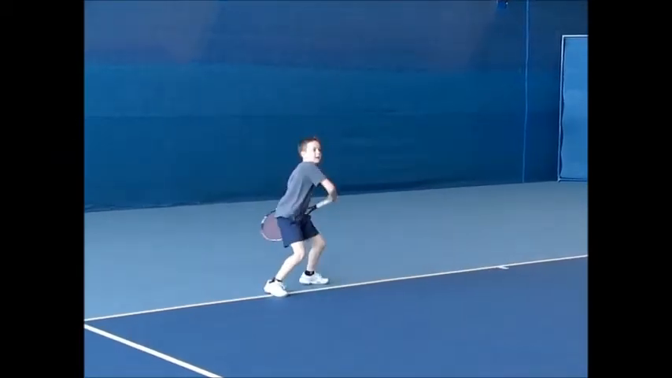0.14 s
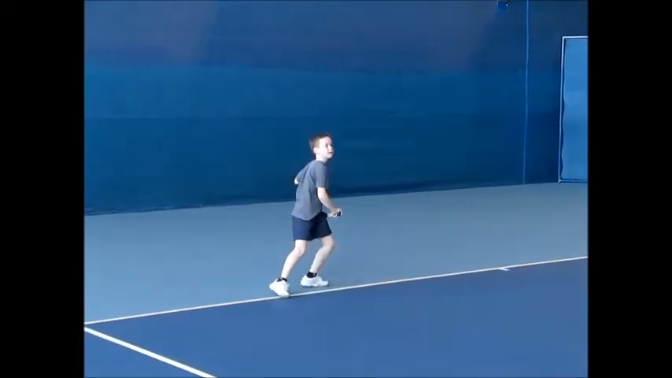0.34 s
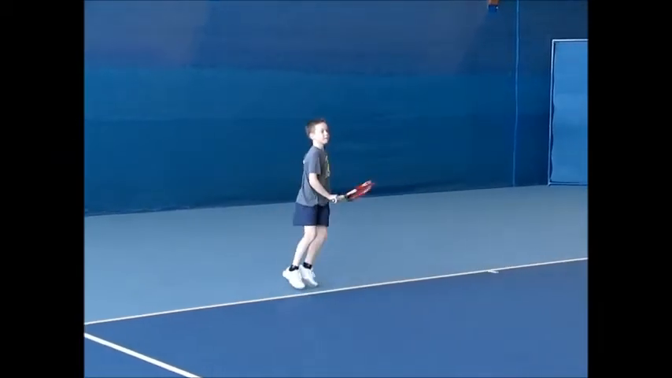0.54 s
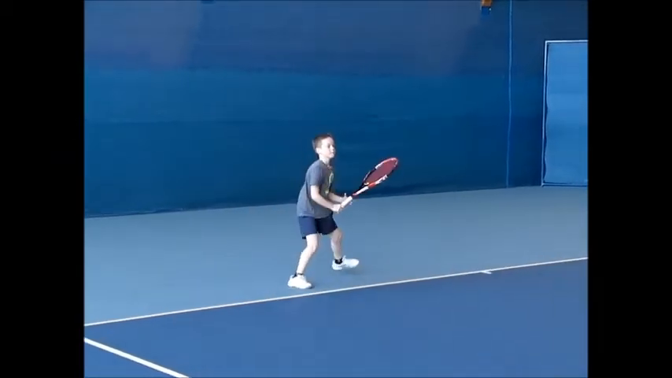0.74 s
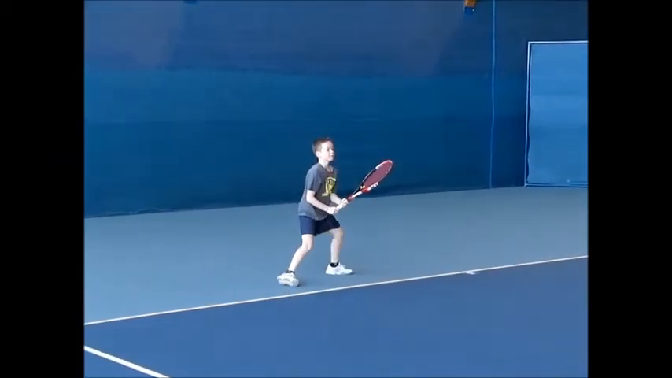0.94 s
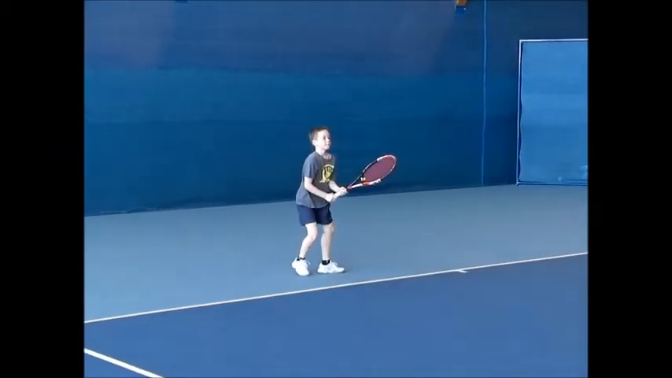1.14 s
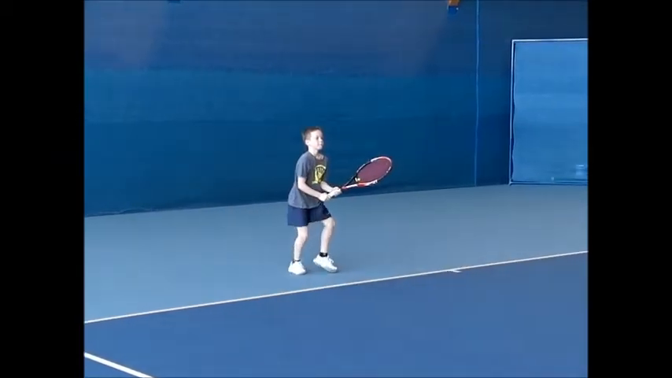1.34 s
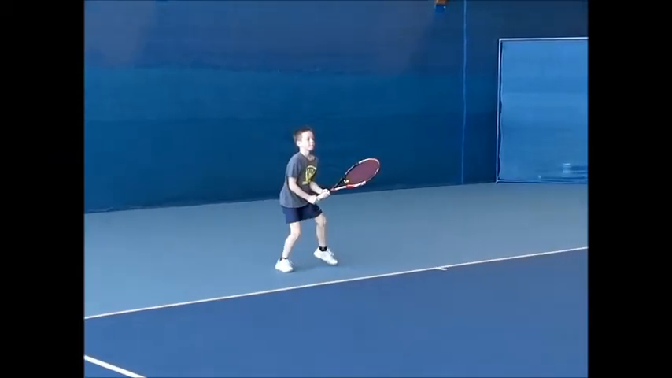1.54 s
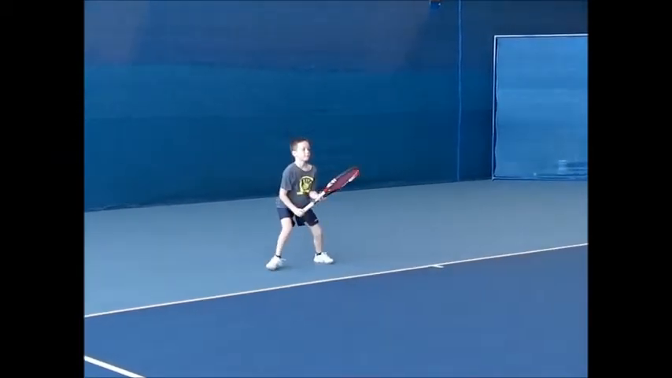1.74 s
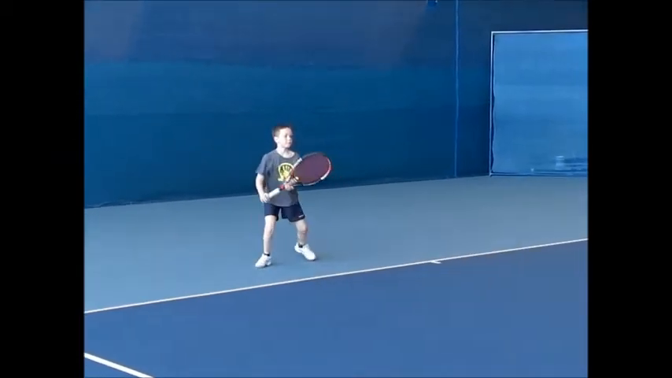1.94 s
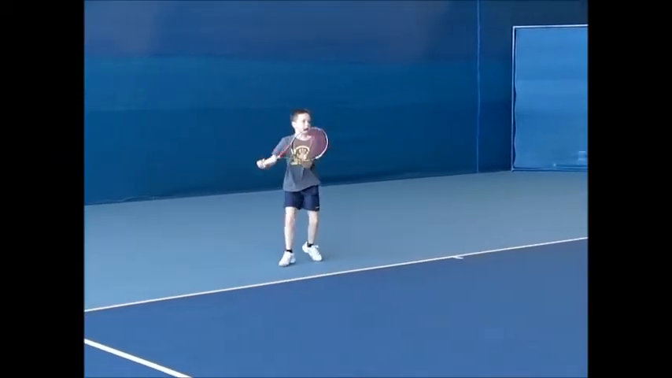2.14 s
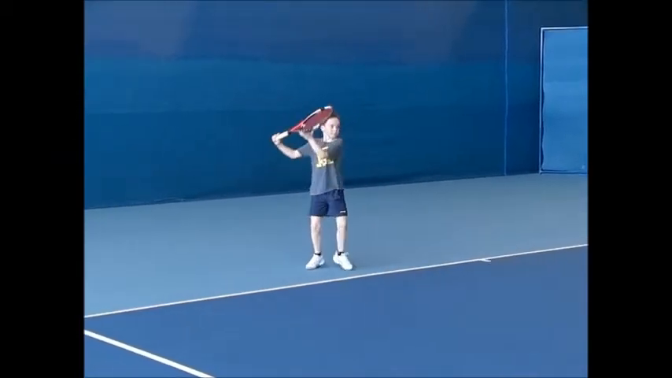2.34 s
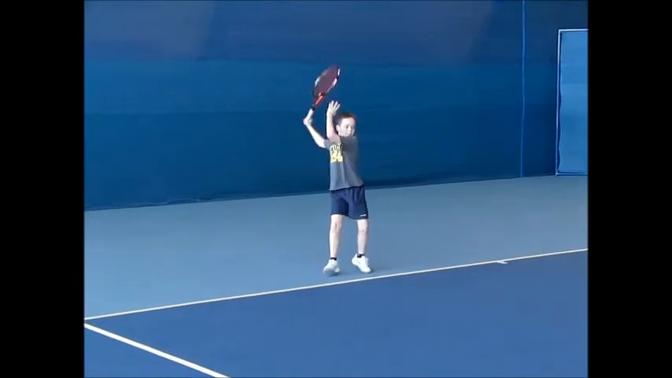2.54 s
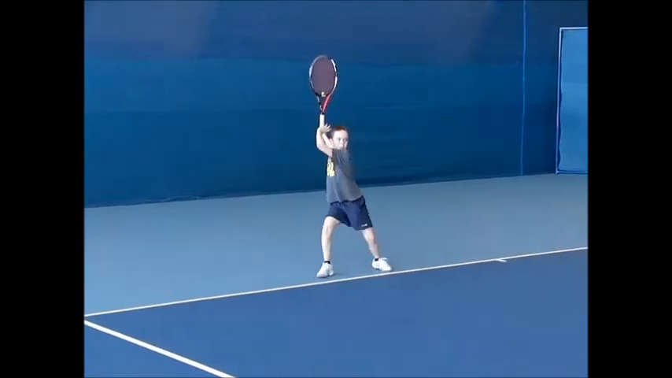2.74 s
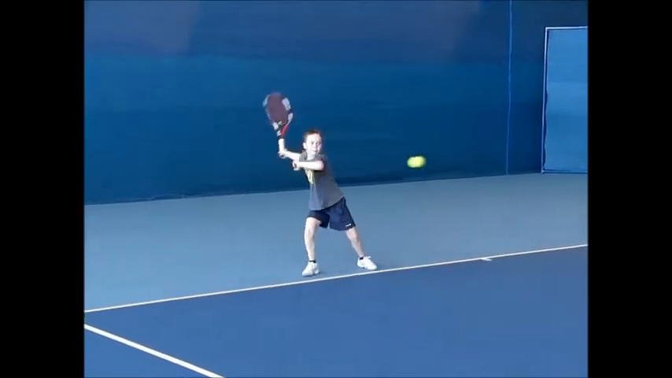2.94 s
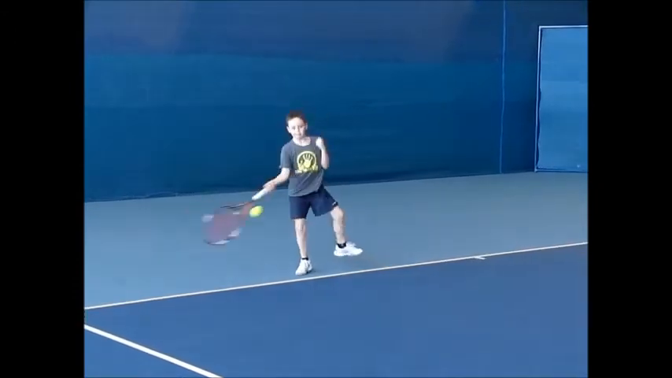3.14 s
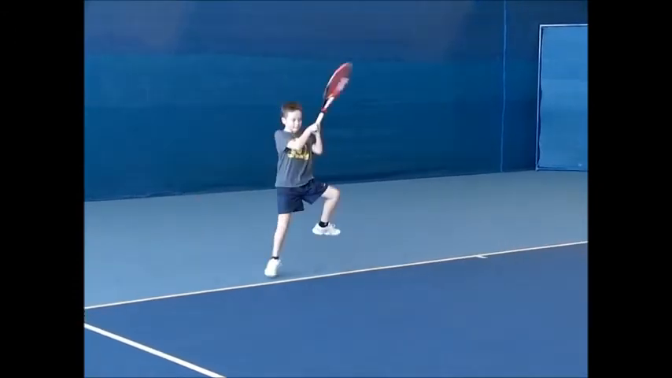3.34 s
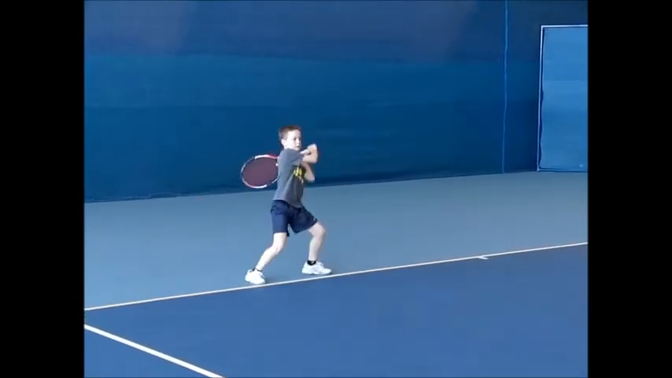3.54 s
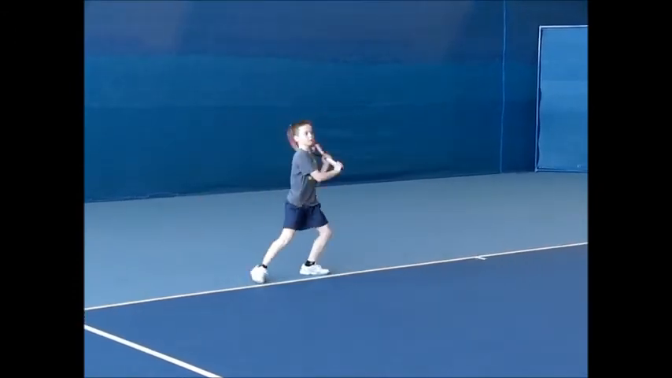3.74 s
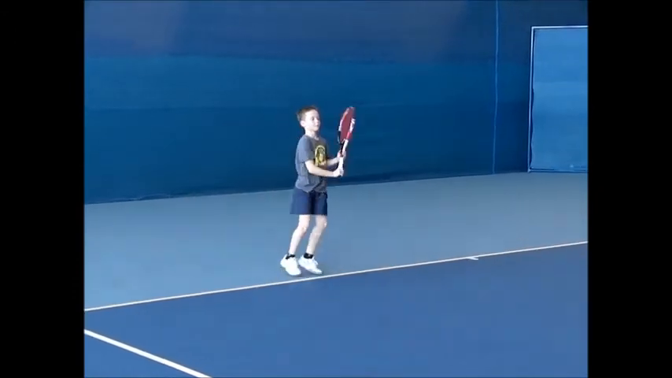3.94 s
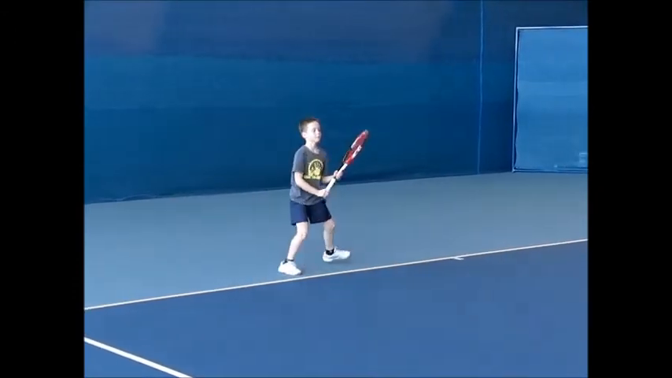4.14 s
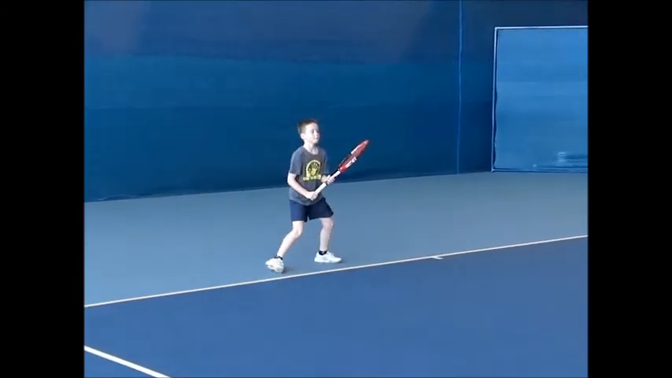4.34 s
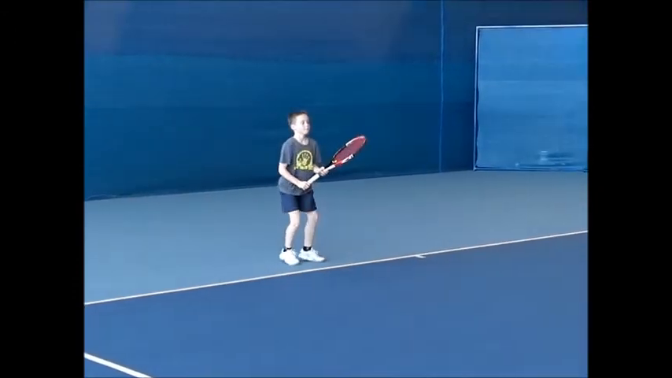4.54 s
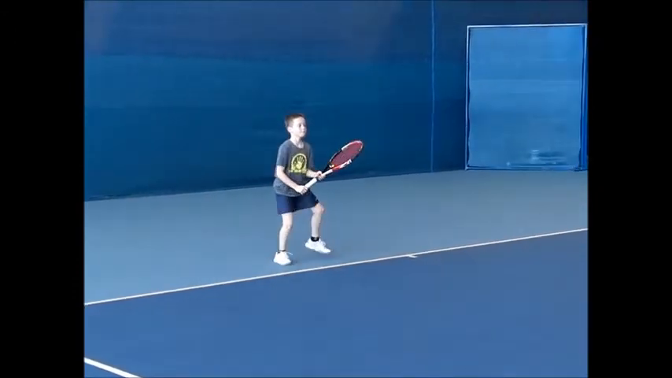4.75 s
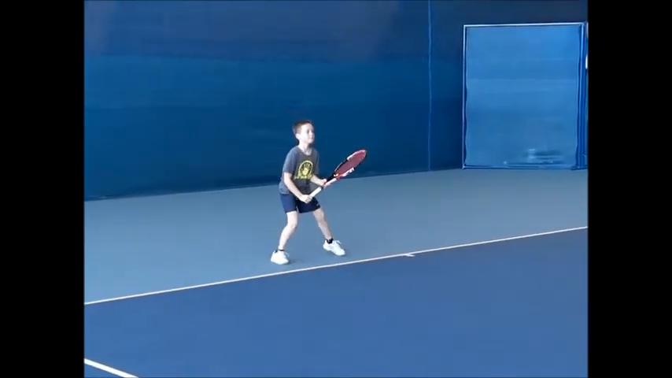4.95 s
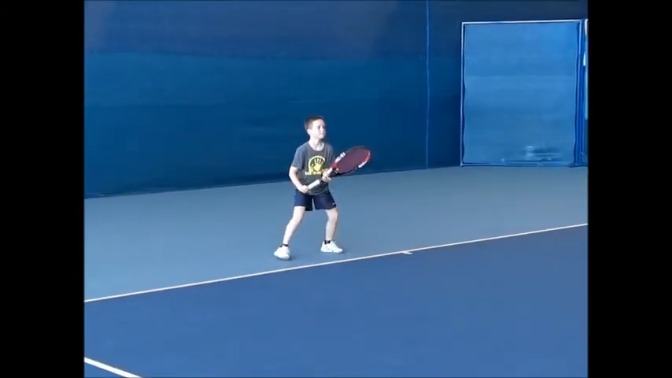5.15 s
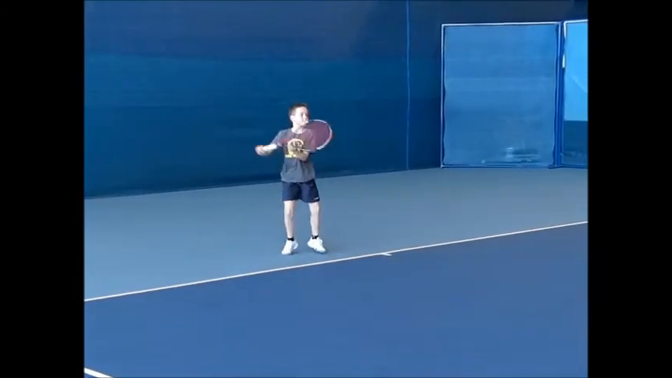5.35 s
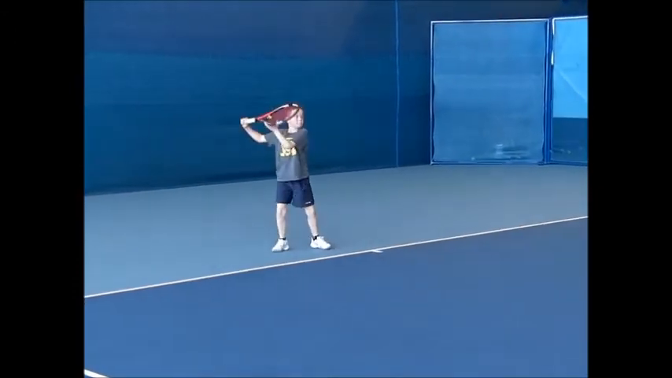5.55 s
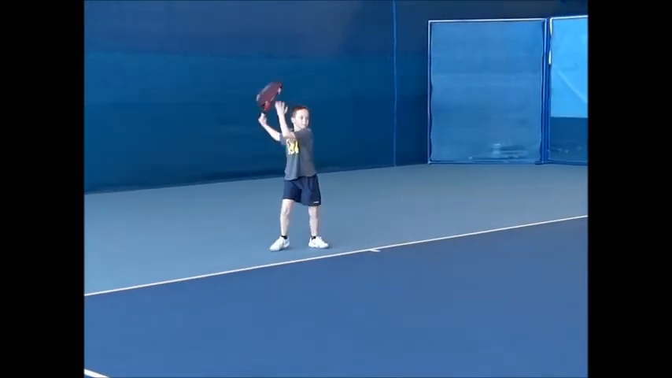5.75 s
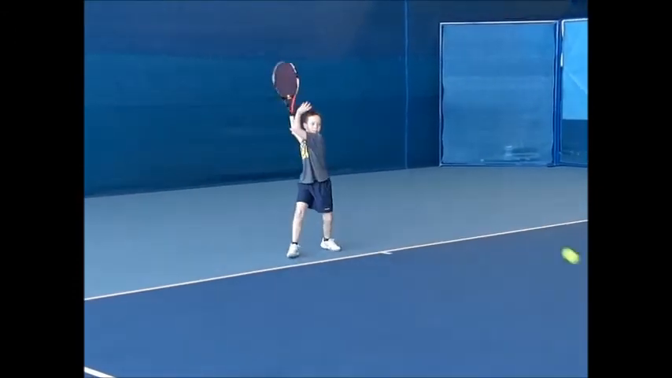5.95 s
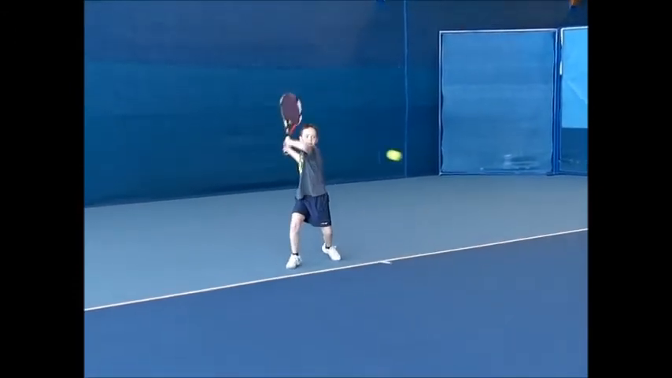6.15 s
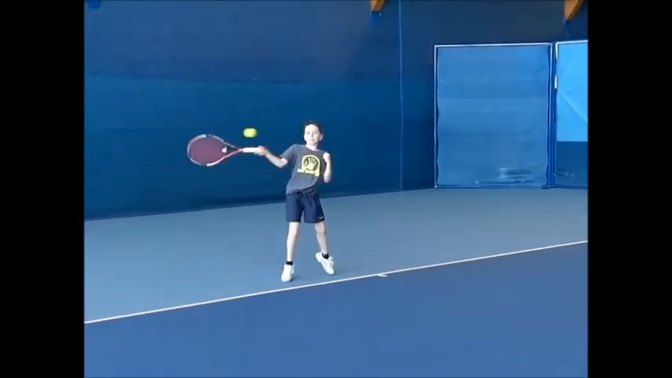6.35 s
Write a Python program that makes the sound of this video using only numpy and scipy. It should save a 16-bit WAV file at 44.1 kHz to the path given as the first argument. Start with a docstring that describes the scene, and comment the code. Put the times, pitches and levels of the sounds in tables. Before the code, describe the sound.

Inside a large reverberant tennis hall, heard courtside in wide stereo. The opening carries the fading echo of a stroke just before, with a faint shoe scuff. Around 1.0 s a dull far bounce and gritty shuffling lead to a softer, distant racket hit at 1.4 s, smeared by wall echoes. Light scuffs follow from 2.1 s, with a crisp nearer bounce at 2.4 s and soft steps about 2.7 and 3.0 s. At 3.2 s a loud, deep close pop cracks and rings through the hall. A faint far bounce at 4.1 s and footfalls precede a distant hollow pop at 4.7 s. Quiet scuffs come at 5.3 s, a clear near bounce at 5.9 s with small knocks, then a bright, pingy near stroke at 6.4 s, cut off almost immediately. Throughout, soft ventilation air, a wavering low duct hum and a very faint high whine.

```python
"""Racket strokes of an indoor tennis rally, heard courtside through two closely spaced microphones.
Stroke: windowed sine thump, decaying string modes and a shaped noise crack; court, wall, roof and hall echoes.
Ball bounces and soft knocks (footfalls, late wall returns of far bounces): gritty modal click, hollow thump.
Scuffs: noise hiss and random grains.
Background: shaped noise for ventilation air, a wavering duct sine and a thin high whine."""
import sys
import numpy as np
from scipy import signal
from scipy.fft import rfft, irfft
from scipy.io import wavfile
from scipy.ndimage import uniform_filter1d, minimum_filter1d, map_coordinates

SR = 44100
rng = np.random.default_rng(int(sys.argv[2]) if len(sys.argv) > 2 else 0)


def store_pcm(level_fs):
    """Save levels as 16-bit WAV."""
    pcm = np.round(np.clip(level_fs, -1, 1) * 32767).astype(np.int16)
    wavfile.write(sys.argv[1], SR, np.atleast_2d(pcm).T)


N = 285768
LEAD_IN = SR  # samples kept before t = 0, so earlier events can ring into the scene


# racket strokes: (time [s], end of court, thump [Hz], thump length [cycles], thump [dB], string tuning [ratio],
#   ping [dB], off centre [0 sweet spot, 1 near frame], extra beamed ping [dB], crack [dB],
#   extra beamed crack [dB], hall [dB], court echo delay [s], thump in court echo [dB],
#   wall echo delay [s], wall echo [dB], late echoes [dB])
STROKE_EVENTS = [ (-.221, "near", 331, 0.71, -11.5, 0.92, -10, 0.36, -2.1, -9.5, -1.5, 1.7, .0112, -4.1, .0351, -3.1, 0),
                 (1.4036, "far", 292, 0.63, -15.5, 0.98, -25.5, 1, 10.5, -27, 11, 1.24, .0101, -8, 0.022, -6, 3.5),
                 (3.2166, "near", 350, 0.65, -6.5, 0.96, -13.5, .05, 4, -8, 0.5, -4.5, .0112, -1, 0.032, -9.5, 0.5),
                 (4.7110, "far", 391, 0.61, -6.5, 1.003, -18.5, 0.044, 6.5, -24.5, 13.5, -0.47, .0096, -4.5, .0301, -7, 2.5),
                 (6.4369, "near", 376, 0.55, -9.5, 0.95, -3.5, 0.82, -9, -5.5, -5.5, 0.5, 0.012, -7, 0.027, -7, -9)]
# string bed and frame modes, before tuning: (frequency [Hz], level [dB], t60 [s], change near frame [dB])
NEAR_RACKET_MODES = [(627, -14.5, 0.14, -6.5), (975, 2, 0.031, -3.5), (1041, -18.5, 0.092, 7),
                     (1065, -10.5, 0.039, -14), (1210, -25.5, 0.063, -5), (1538, -26.5, 0.078, 19.5),
                     (1930, -23, 0.065, -15), (2123, -26, 0.052, 5), (2295, -17.5, 0.022, 12),
                     (2458, -10.5, 0.03, -7), (3520, -8, 0.0064, -9), (3620, -28, 0.054, -18),
                     (4080, -26, 0.0083, -3)]
FAR_RACKET_MODES = [(606, -10, .06, -14), (748, -24.5, 0.037, 14.5), (903, -1, 0.03, -0.5),
                    (983, -3.5, 0.065, -22), (1270, -21, 0.048, -13), (1797, -20, 0.1, -4),
                    (1872, -17, 0.054, 6), (2070, -13.5, 0.05, -8), (2490, -16.5, 0.039, -3),
                    (3220, -10, 0.0092, 2.5), (4000, -34, .007, 18)]
# felt slapping strings, relative spectrum: (frequency [Hz], level [dB])
CRACK_SPECTRUM = [(100, -38), (500, 17.5), (1300, 10), (2200, 2.5), (3600, -2.5), (4600, -9.5),
                  (6000, -17.5), (8000, -20.5), (11000, -10.5), (16000, -27)]
# ends of court: (left microphone lead [ms], wall echo swell [s], mirror share [ratio], beamed top [Hz])
COURT_ENDS = {"near": (.057, .0021, .21, 11100), "far": (-.13, .0085, .2, 12500)}
# late echoes off far walls, roof and floor (the first near one a floor bounce after the wall echo): (end of
# court, delay [s], level [dB], spread [s], top [Hz])
LATE_ECHOES = [("near", .0415, -14, 0.013, 1300), ("near", 0.054, -13, .011, 4600),
               ("far", .107, -9.5, .012, 5000), ("far", .148, -10, 0.048, 7800)]
COURT_PING_DB, COURT_CRACK_DB = -16, -18.5  # gains in the court echo


def strokes():
    """Racket strokes, each thrown back by court, walls and roof, then by the hall."""
    track, t = np.zeros((2, LEAD_IN + N)), seconds(.1)
    for (at, end, hz, cycles, thump_db, tuning, ping_db, off_centre, ping_beam_db, crack_db, crack_beam_db,
         hall_db, court_s, court_db, wall_s, wall_db, late_db) in STROKE_EVENTS:
        lead_ms, swell_s, mirror, top_hz = COURT_ENDS[end]
        body = undb(thump_db) * thump(t - .0026, hz, cycles)
        # impact point weights the modes; strings ring freely once the ball has left
        racket = NEAR_RACKET_MODES if end == "near" else FAR_RACKET_MODES
        modes = [(f, db + off_centre * edge_db, t60) for f, db, t60, edge_db in racket]
        ping = undb(ping_db) * ring(t - .0036, modes, tuning)
        crack = undb(crack_db) * slap(t, rise_s=0.0026, spectrum=CRACK_SPECTRUM)
        add(track, arrive(body + ping + crack, lead_ms), at)

        off_court = undb(court_db) * body + undb(COURT_PING_DB) * ping
        off_court += undb(COURT_CRACK_DB) * dull(crack, DRAPE_HZ)
        add(track, arrive(off_court, lead_ms / 2), at + court_s)

        # racket face beams treble along the court; the long path dulls it
        beamed_ping, beamed_crack = undb(ping_beam_db) * ping, undb(crack_beam_db) * crack
        beamed = dull(radiate(body, beamed_ping, beamed_crack), top_hz)
        draped = dull(beamed, 2 * DRAPE_HZ)
        wall = scatter(draped, spread_s=0.011, mirror=mirror, swell_s=swell_s)
        add(track, undb(wall_db) * wall, at + wall_s)
        for source, delay_s, echo_db, spread_s, echo_top_hz in LATE_ECHOES:
            if source == end:
                echo = scatter(dull(beamed, echo_top_hz), spread_s, mirror, swell_s)
                add(track, undb(late_db + echo_db) * echo, at + delay_s)
        add(track, undb(hall_db) * reverberate(beamed, hall()), at)
    return track


def thump(t, hz, cycles):
    """Air pushed out and drawn back as the ball flattens and recovers, centred on t = 0."""
    return np.exp(-(t * hz / cycles) ** 2) * np.sin(2 * np.pi * hz * t)


def ring(t, modes, tuning=1):
    """Struck modes decaying exponentially; silent before t = 0."""
    t = np.maximum(t, 0)
    return sum(undb(db) * fade(t, t60) * np.sin(2 * np.pi * hz * tuning * t) for hz, db, t60 in modes)


def slap(t, rise_s, spectrum):
    """Contact noise that swells as ball or sole is squashed; smooth, broad spectrum."""
    burst = rfft(rng.standard_normal(len(t)) * t * np.exp(-t / rise_s))
    flat = irfft(burst / np.abs(burst), len(t))  # keeps phase only
    even = colour(flat, spectrum)
    level = 10 / np.sqrt(np.sum(even ** 2))
    return level * even * fade(t, 0.34) * np.minimum(2 * t / rise_s, 1)


def radiate(*parts):
    """Output in all directions: part powers add, as one causal minimum-phase pulse."""
    size = len(parts[0])
    power = np.sum(np.abs(rfft(np.array(parts), 2 * size)) ** 2, axis=0)
    cepstrum = irfft(np.log(power + 1e-9))[:size]
    cepstrum[0] /= 2
    return irfft(np.exp(rfft(cepstrum, 2 * size)))[:size]


# ball bounces: (time [s], side of net, click [dB], click top [Hz], first echo [dB],
#   second echo delay [s], second echo [dB])
BOUNCE_EVENTS = [(1.0486, "far", -21, 2460, -4, 0.11, -5), (2.4147, "near", -14, 4500, -6.5, 0.0477, -1),
                 (4.1075, "far", -22.5, 3440, 0, .1112, -12), (5.9189, "near", -13, 7360, -7, 0.0422, -5)]
# sides of net: (click tuning [ratio], thump re click [dB], hall [dB], left microphone lead [ms],
#   first echo delay [s])
LANDING_SIDES = {"near": (1.04, -9.5, -5.5, -.12, .014), "far": (1.04, -11, 3.5, -.15, .0405)}


def bounces():
    """Ball impacts on either side of the net; two walls answer each."""
    track, room = np.zeros((2, LEAD_IN + N)), hall()
    for at, side, click_db, top_hz, first_db, second_s, second_db in BOUNCE_EVENTS:
        tuning, thump_db, hall_db, lead_ms, first_s = LANDING_SIDES[side]
        pop = knock(click_db, click_db + thump_db, top_hz, tuning)
        add(track, arrive(pop, lead_ms), at)
        add(track, undb(first_db) * scatter(pop, spread_s=0.011, mirror=0.64), at + first_s)
        add(track, undb(second_db) * scatter(pop, spread_s=0.028, mirror=0.7), at + second_s)
        add(track, undb(hall_db) * reverberate(pop, room), at)
    return track


# click modes of the hard court, before tuning: (frequency [Hz], level [dB], t60 [s])
COURT_MODES = [(1100, 0, 0.0079), (1720, 10.5, 0.0016), (3240, -6, 0.0047), (4150, -34, 0.0046)]
# court grit in a click, relative spectrum: (frequency [Hz], level [dB])
GRIT_SPECTRUM = [(100, -12), (280, 32), (600, -6), (1200, 9), (2200, 5), (3600, 10.5), (4600, -24),
                 (6000, -51), (8000, -2), (11000, -10), (16000, -30)]


def knock(click_db, thump_db, top_hz, tuning=1):
    """Impact on the hard court: a gritty click, then a hollow thump."""
    t = seconds(.06)
    # small contact patch radiates little bass
    bass_cut = signal.butter(1, 700, "highpass", fs=SR, output="sos")
    tick = signal.sosfilt(bass_cut, ring(t - .0001, COURT_MODES, tuning) / 2)
    grit = undb(-17.5) * slap(t, rise_s=0.0031, spectrum=GRIT_SPECTRUM)
    click = dull(dull(tick + grit, top_hz), 2 * top_hz)
    return undb(click_db) * click + undb(thump_db) * thump(t - .0033, hz=226, cycles=0.51)


# soft knocks on the court, footfalls and late returns of far bounces off the walls:
#   (time [s], click [dB], thump re click [dB], sharpness [ratio of clear knock to smear, 0 all smeared], hall [dB])
SOFT_KNOCK_EVENTS = [(1.089, -22, -16, .9, -1.5), (2.703, -23, -18, .7, -14), (3.044, -29, -11, 0.57, -6),
                     (4.217, -25, -22, 2.4, -14), (4.228, -26.5, -0.5, .8, -1),
                     (4.359, -26.5, -18, 0.47, 3), (4.56, -24.5, -6, 0.66, -1),
                     (5.968, -18.5, -10.5, .9, 1), (6.052, -24, -12, 0.63, 4)]
SOFT_KNOCK_TOP_HZ = 2900


def soft_knocks():
    """Footfalls, and late wall returns of far bounces: each a clear knock mixed with its smear."""
    track, room = np.zeros((2, LEAD_IN + N)), hall()
    for at, click_db, thump_db, sharpness, hall_db in SOFT_KNOCK_EVENTS:
        tap = knock(click_db, click_db + thump_db, SOFT_KNOCK_TOP_HZ)
        add(track, scatter(tap, spread_s=0.034, mirror=sharpness), at)
        add(track, undb(hall_db) * reverberate(tap, room), at)
    return track


# shoe slides: (peak time [s], half length [s], hiss [dB], rasp [dB])
SCUFF_EVENTS = [(0.013, 0.038, -50.5, -69), (0.447, 0.042, -57, -50), (1.003, 0.057, -50, -49.5),
                (1.079, 0.049, -46.5, -44.5), (1.2, 0.049, -50, -44.5), (2.095, 0.015, -49, -47.5),
                (2.211, 0.014, -49, -72), (2.326, 0.007, -46.5, -68), (2.43, 0.017, -44.5, -39.5),
                (2.657, 0.01, -45, -52), (2.713, 0.037, -51, -49), (3.502, 0.063, -53.5, -47),
                (3.874, 0.047, -54, -69), (4.223, 0.011, -66, -34), (4.287, 0.019, -63, -45),
                (4.463, 0.042, -45.5, -48.5), (4.559, 0.037, -48.5, -48.5), (5.33, 0.044, -46, -63),
                (5.43, 0.033, -54.5, -78), (5.977, 0.012, -45.5, -44.5), (6.424, 0.0066, -55, -61)]
# sliding sole hiss, relative spectrum: (frequency [Hz], level [dB])
SOLE_SPECTRUM = [(500, 14.5), (1400, 11.5), (2200, 11), (3800, 13), (5500, -1.5), (8000, -20), (10000, 6.5),
                 (11400, 5), (13500, -2), (16000, -26)]
# grit catching under a sole, relative spectrum: (frequency [Hz], level [dB])
RASP_SPECTRUM = [(100, -3), (500, -2), (1000, 1), (1600, 2), (2300, -0.5), (3500, -14.5), (6000, -40),
                 (16000, -32)]
GRAINS_PER_S, RASP_HALL_DB, RASP_LEAD_MS = 830, 0, -0.08
SPIT_S, SPIT_DEPTH = 0.0017, 0.58  # decay and depth of the hiss lift per grain


def scuffs():
    """Sliding soles hiss unevenly; grit catching under them rasps and excites the hall."""
    t = np.arange(N) / SR
    hiss_power, rasp_power = 0, 0
    for at, half_s, hiss_db, rasp_db in SCUFF_EVENTS:
        slide = np.exp(-np.minimum(((t - at) / half_s) ** 2, 50))
        hiss_power = hiss_power + undb(2 * hiss_db) * slide
        rasp_power = rasp_power + undb(2 * rasp_db) * slide
    grip = undb(1.5 * unit(uniform_filter1d(rng.standard_normal(N), size=300)))
    hiss = np.sqrt(hiss_power) * grip * unit(colour(diffuse(N), SOLE_SPECTRUM))

    grains = (rng.random(N) < GRAINS_PER_S / SR) * rng.standard_normal(N)
    # each catching grain makes the hiss spit
    grain_power = signal.lfilter([1], [1, -np.exp(-1 / (SPIT_S * SR))], grains ** 2)
    spit = unit(grain_power ** .5)
    hiss = hiss * unit(1 + SPIT_DEPTH * spit)

    rasp = np.sqrt(rasp_power) * unit(colour(grains, RASP_SPECTRUM))
    rasp_hall = undb(RASP_HALL_DB) * reverberate(rasp, hall())[:, :N]
    return hiss + arrive(rasp, RASP_LEAD_MS) + rasp_hall


DRAPE_HZ = 5400  # reference treble limit of the draped walls, scaled at use


def scatter(x, spread_s, mirror, swell_s=0.001):
    """Short noise spray with evened spectrum plus one softened mirror image, as off a draped wall."""
    t = seconds(.08)
    swell = 1 - np.exp(-(t / swell_s) ** 2)
    spray = rfft(diffuse(len(t)) * swell * np.exp(-(t / spread_s) ** 2))
    # divide out the colour common to both channels
    spray = irfft(spray / np.sqrt(np.mean(np.abs(spray) ** 2, axis=0)), len(t)) * fade(t, 0.23)
    spray += mirror * dull(signal.unit_impulse(len(t), int(swell_s * SR)), DRAPE_HZ / 2)
    return reverberate(x, spray) / np.sqrt(0.48 + mirror ** 2)


# hall reverberation, relative levels: (band centre [Hz], level [dB], t60 [s])
HALL_BANDS = [(64.6, -55, 1.2), (142, 6, 2.46), (258, 4.5, 2.88), (505, 1, 3.33), (950, 3, 3.29),
              (2170, 3.5, 4.02), (3140, 6, 2.36), (5750, 3, 1.72), (12100, -2.5, 2.4)]


def hall():
    """Hall impulse response: diffuse build-up, then band-wise exponential decay."""
    t = np.arange(2 * SR) / SR
    noise = rfft(diffuse(len(t)))
    f = np.maximum(np.fft.rfftfreq(len(t), 1 / SR), 1)
    centres, tail = np.log([row[0] for row in HALL_BANDS]), 0
    for (hz, db, t60), band in zip(HALL_BANDS, np.eye(len(HALL_BANDS))):
        band_noise = irfft(noise * np.interp(np.log(f), centres, band), len(t))
        tail = tail + undb(db) * fade(t, t60) * band_noise
    build_up = 1 - np.exp(-(t / 0.027) ** 2)
    # nearby walls return more at first than the rest of the hall
    near_walls = 1 + fade(t, 0.7)
    return undb(-43.0) * tail * build_up * near_walls


# ventilation air, relative spectrum: (frequency [Hz], level [dB])
AIR_SPECTRUM = [(20, -7), (70, -7), (120, -4), (240, 2.7), (450, -10.5), (700, -14.5), (950, -4),
                (1400, -10), (2200, -10), (4000, -21.5), (6500, -32), (11000, -31.5), (16000, -31.5)]
# slow swell of duct rumble, before DUCT_DB and waver: (time [s], level [dB])
RUMBLE_LEVEL = [(0, -43), (.29, -40.5), (.55, -51.5), (2.85, -60), (3.55, -49), (3.73, -49.5), (4.2, -46.5),
                (5.02, -47.5), (5.48, -56.5), (5.62, -47), (6.05, -55), (6.3, -64)]
DUCT_HZ, DUCT_DB = 48.7, -2.5
DUCT_WAVER_RAD, DUCT_WAVER_DB = 0.31, 4.5  # rms random wander of phase and level


def ventilation():
    """Steady air rush, low draught, wavering and swelling duct tone, thin electrical whine."""
    t = np.arange(N) / SR
    rush = undb(-50.0) * unit(colour(diffuse(N), AIR_SPECTRUM))
    draught_spectrum = [(20, -13), (70, -2.5), (200, -3.5), (1000, -32.5)]
    draught = undb(-59.0) * unit(colour(rng.standard_normal((2, N)), draught_spectrum))

    waver_spectrum = [(1, 13), (5, -10), (15, -34), (100, -100)]
    phase_waver, level_waver = unit(colour(rng.standard_normal((2, N)), waver_spectrum))
    duct = np.sqrt(2) * np.sin(2 * np.pi * DUCT_HZ * t + DUCT_WAVER_RAD * phase_waver)
    swell_db = np.interp(t, *np.transpose(RUMBLE_LEVEL))
    duct_db = DUCT_DB + swell_db + DUCT_WAVER_DB * level_waver

    whine = undb(-73.0) * np.sin(2 * np.pi * 15734 * t)
    return rush + draught + duct * undb(duct_db) + whine


MIC_SPACING_M = 0.094


def diffuse(size):
    """Noise from all sides: alike at both microphones in the bass, unrelated in the treble."""
    alike = np.sinc(2 * np.fft.rfftfreq(size, 1 / SR) * MIC_SPACING_M / 343)  # 343 m/s
    balance = np.sqrt([(1 + alike) / 2, (1 - alike) / 2])
    mid, side = irfft(rfft(rng.standard_normal((2, size))) * balance, size)
    return np.array([mid + side, mid - side])


def arrive(x, lead_ms):
    """Directional sound: left microphone leads by lead_ms, right if negative."""
    i, shift = np.arange(len(x)), lead_ms * SR / 2000  # half the lead per channel
    return np.array([map_coordinates(x, [i + s], order=3) for s in (shift, -shift)])


def reverberate(x, response):
    """Convolve a mono sound with a stereo response."""
    return signal.fftconvolve(x[None], response, axes=1)


def add(track, x, at):
    """Mix x at a time [s] into a track that starts LEAD_IN samples early."""
    i = max(LEAD_IN + int(round(at * SR)), 0)
    room = track[..., i:i + x.shape[-1]]
    room += x[..., :room.shape[-1]]


def undb(db):
    """Decibels to amplitude ratio."""
    return 10 ** (np.asarray(db) / 20)


def seconds(length):
    """Time axis [s] of the given length."""
    return np.arange(int(length * SR)) / SR


def unit(x):
    """Scale to rms 1."""
    return x / np.sqrt(np.mean(x ** 2))


def fade(t, t60):
    """Exponential decay, 60 dB in t60."""
    return np.exp(-np.log(1000) * t / t60)


def colour(x, points):
    """Filter by (frequency [Hz], level [dB]) points, interpolated over log frequency."""
    hz, db = np.transpose(points)
    f = np.maximum(np.fft.rfftfreq(x.shape[-1], 1 / SR), 1)
    return irfft(rfft(x) * undb(np.interp(np.log(f), np.log(hz), db)), x.shape[-1])


def dull(x, hz):
    """Second-order low-pass: round off the treble above hz."""
    return signal.sosfilt(signal.butter(2, min(hz, SR / 2 - 1), fs=SR, output="sos"), x)


def scene():
    """Sum of all sources, lead-in trimmed."""
    events = strokes() + bounces() + soft_knocks()
    return events[:, LEAD_IN:] + scuffs() + ventilation()


# widening of the stereo image: (frequency [Hz], side gain [dB])
SIDE_GAIN = [(120, 1), (300, 3), (600, 4), (1200, 7), (3000, 8.5), (12000, 7.5)]
# narrow dips in the microphones' response: (frequency [Hz], width [Hz])
RESPONSE_DIPS = [(2860, 446), (5000, 190)]
LEFT_DB, CEILING, TOP_HZ = 0.95, .9, 15900


def record(dry):
    """Widen the stereo image, notch two dips, limit the peaks, cut the top."""
    mid, side = (dry[0] + dry[1]) / 2, colour((dry[0] - dry[1]) / 2, SIDE_GAIN)
    out = np.array([undb(LEFT_DB) * (mid + side), mid - side])
    for hz, width_hz in RESPONSE_DIPS:
        out = signal.lfilter(*signal.iirnotch(hz, hz / width_hz, fs=SR), out)
    # fast limiter with a short look-ahead
    gain = CEILING / np.maximum(np.abs(out).max(axis=0), CEILING)
    out = out * uniform_filter1d(minimum_filter1d(gain, size=201), size=201)
    return signal.sosfilt(signal.ellip(10, .2, 80, TOP_HZ, fs=SR, output="sos"), out)


dry = scene()
out = record(dry)
store_pcm(out)
```